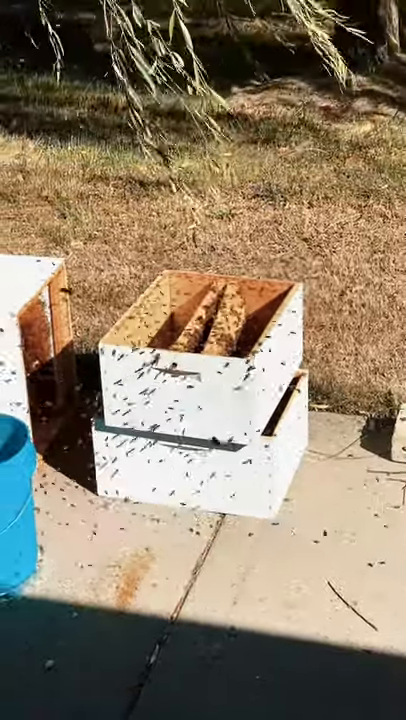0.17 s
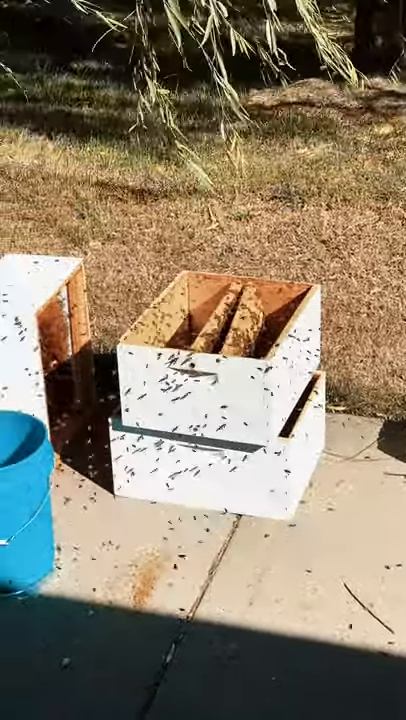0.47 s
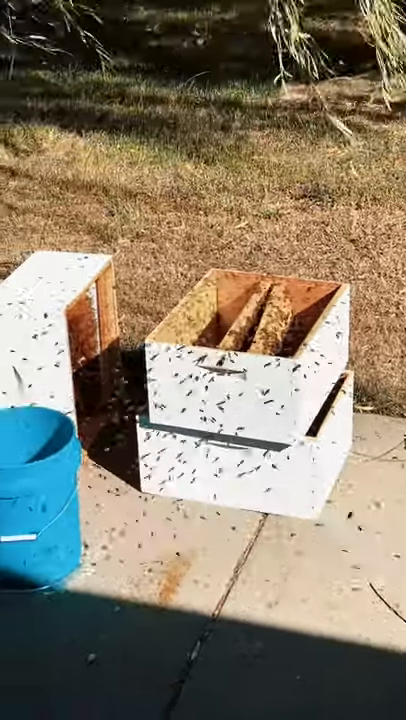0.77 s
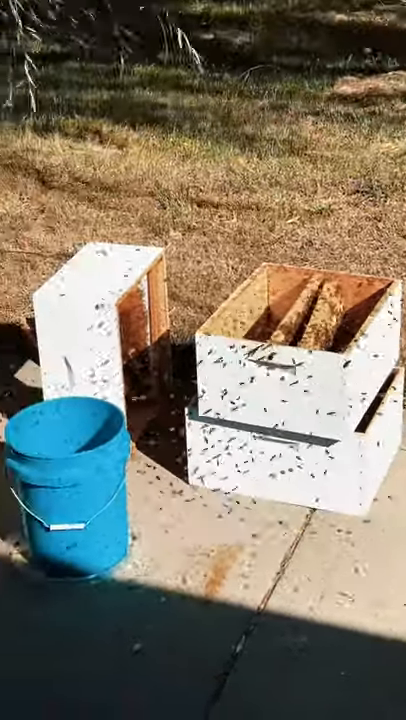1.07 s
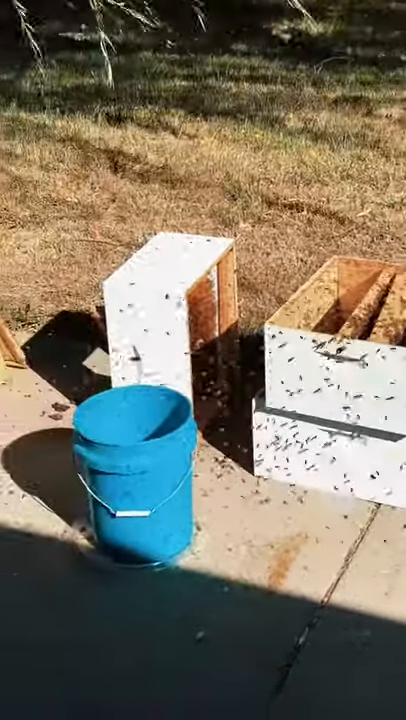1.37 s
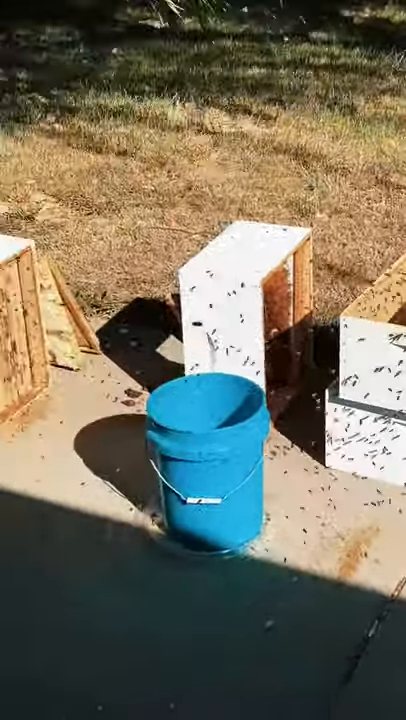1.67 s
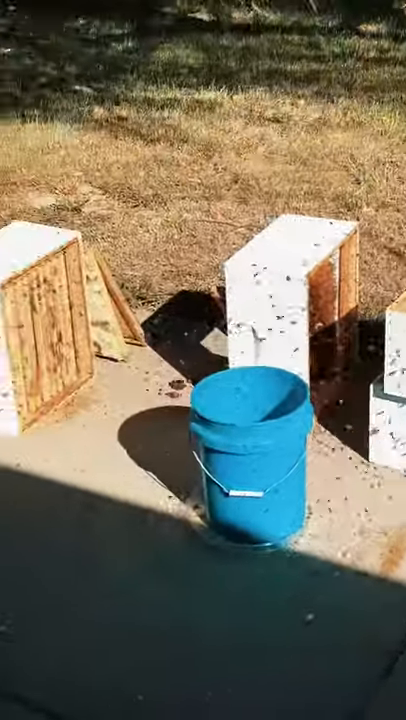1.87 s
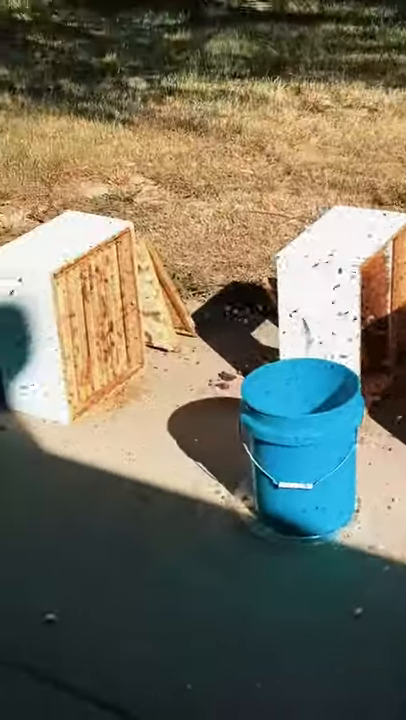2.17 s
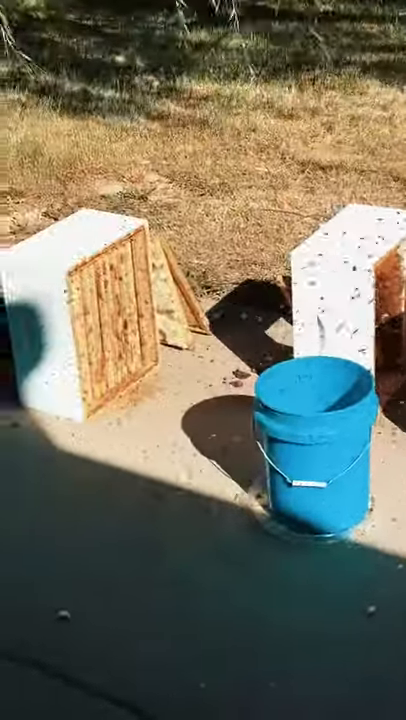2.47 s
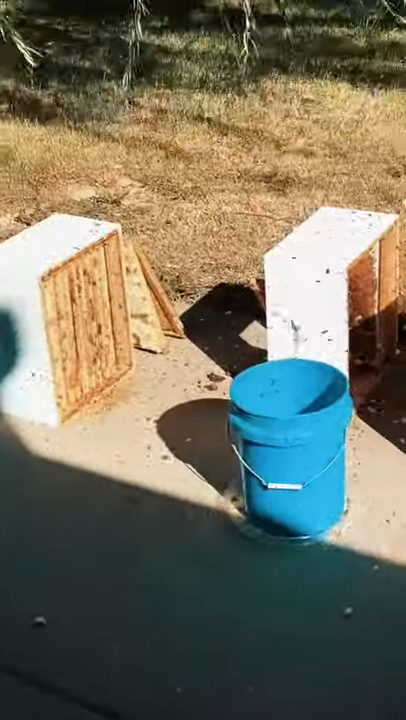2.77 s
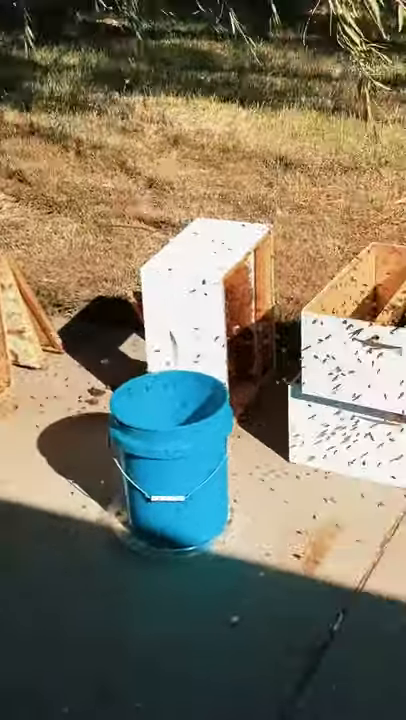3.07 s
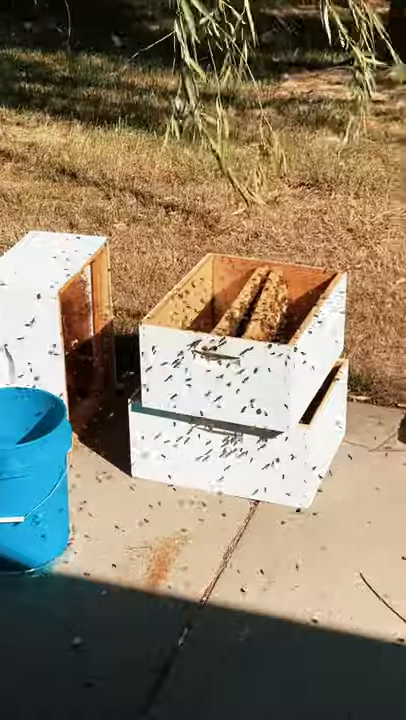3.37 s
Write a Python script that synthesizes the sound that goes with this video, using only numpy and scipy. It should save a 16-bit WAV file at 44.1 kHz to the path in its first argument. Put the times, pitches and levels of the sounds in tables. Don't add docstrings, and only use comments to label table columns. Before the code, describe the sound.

Many bees hum in a dense, continuous drone over airy hiss and low puffs of wind.

```python
import sys
import numpy as np
from scipy import signal
from scipy.fft import rfft, irfft, next_fast_len
from scipy.io import wavfile
from scipy.ndimage import uniform_filter1d, map_coordinates

SR = 44100
rng = np.random.default_rng(int(sys.argv[2]) if len(sys.argv) > 2 else 0)


def elevation(decibels):
    levels = np.asarray(decibels, float)
    return 10 ** (levels / 20)


def store_pcm(level_fs):
    pcm = np.round(np.clip(level_fs, -1, 1) * 32767).astype(np.int16)
    wavfile.write(sys.argv[1], SR, np.atleast_2d(pcm).T)


N = 154791

# (time [s], level change [dB])
SWARM_LEVEL = [(0, 0), (1.2, .4), (2.0, 0), (2.8, -.8), (3.51, -.2)]
# (frequency [Hz], level [dB])
WING_SPECTRUM = [(150, -4), (250, -1), (520, 1.5), (770, -6.5), (1300, -8.5), (1900, -18.5), (3500, -22.5),
                 (4500, -72)]
# (frequency [Hz], level [dB])
LEFT_WING_SPECTRUM = [(300, -36), (520, 0.5), (780, 1), (1300, -2.5), (1550, -6), (1750, -61)]
# (time [s], half length [s], wingbeat [Hz], level [dB])
CLOSE_BEES = [
    (3.311, 0.022, 260.4, -51.5),
    (3.378, 0.018, 261.4, -48.5),
    (3.47, 0.039, 258.7, -50.5),
]
# (time [s], peak level [dB], pitch [Hz])
WIND_PUFFS = [(0.29, -32.5, 111), (0.347, -32, 64.6), (0.529, -32, 64), (0.585, -29, 63), (0.655, -29, 67),
              (0.724, -32.5, 75.4), (0.839, -36.5, 58.7), (1.499, -38, 59.2), (1.574, -20.5, 131),
              (1.618, -29, 56), (1.689, -33, 117), (1.74, -38, 86.1), (1.794, -27, 116), (1.839, -24.5, 99),
              (1.933, -28, 70.5), (1.969, -32.5, 48.4), (2.034, -24.5, 122), (2.059, -28, 82),
              (2.09, -35, 68.5), (2.184, -33, 88), (2.228, -35.5, 79.4), (2.871, -36, 63),
              (2.919, -36.5, 56), (2.969, -36, 72.7), (3.045, -32.5, 99.6), (3.061, -27.5, 67.3),
              (3.223, -26, 195), (3.295, -30, 80.7), (3.46, -27.5, 81), (3.493, -28.5, 84.4)]
# (time [s], level [dB])
WIND_LEVEL = [(0.0, -45), (0.31, -45), (0.5, -45), (0.65, -47.5), (1.16, -50), (1.36, -55.5), (1.49, -42),
              (1.64, -37.5), (1.69, -44.5), (1.91, -42), (2.07, -42.5), (2.24, -60), (2.48, -75),
              (2.75, -54), (3.06, -42), (3.51, -44.5)]
# (frequency [Hz], level [dB])
RUMBLE_SPECTRUM = [(15, -53), (30, -6), (60, 4), (110, -6.5), (180, -11), (300, -19), (500, -50),
                   (900, -90)]
# (frequency [Hz], level [dB])
HISS_SPECTRUM = [(150, 2.5), (400, -6.5), (1500, -6.5), (2200, -10.5), (4500, -14), (10500, -16.5),
                 (12500, -16), (15500, -14.5)]
# (frequency [Hz], level [dB])
OWN_HISS_SPECTRUM = [(1500, -21), (2400, -13), (4200, -7), (4900, -22), (5450, -19), (5800, -13),
                     (11000, -1), (12500, -12.5)]
# (frequency [Hz], level [dB])
YARD_SPECTRUM = [(20, -27), (110, -10.5), (250, -2), (400, -10), (700, -15), (1200, -14), (1500, -22),
                 (1700, -69)]
# (frequency [Hz], phase [rad])
PORT_PHASE = [(600, -.9), (800, 0), (1840, 0), (2600, -1.15), (3720, 0), (4400, -.55), (5250, 0),
              (13000, -3.15)]
# (frequency [Hz], level [dB])
HAND_SHADE = [(650, -2.5), (1400, -2)]

STEP = 4
SWARM_DB, LEFT_DB = -48.5, -3.5
LEFT_LEAK = -0.3
WING_HZ, SPREAD_HZ, SLOW_TAIL_HZ = 272.04, 7, 19
DRIFT_HZ, FLUTTER_HZ = 13, 3
PASS_DB, PASS_RATE = 4.6, 5
PUFF_TURNS, PUFF_SAG = 0.89, 0.6
PUFF_LATE_S, PUFF_TAIL, PUFF_TILT_DB = 0.00742, 1.38, 1.1
HISS_DB, HISS_FADE_DB = -48, -2
OWN_FADE_DB = -5.5
YARD_DB = -63.5
WIND_CUT_HZ, TOP_HZ = 46, 15750
BASS_TURN_HZ = 410
FLIP_HZ, FLIP_WIDE_HZ = 4945, 330
SHADE_START_HZ, SHADE_END_HZ = 430, 1720


def swarm():
    around = bees(WING_SPECTRUM, count=38)
    left = elevation(LEFT_DB) * bees(LEFT_WING_SPECTRUM, count=24)
    crowd = around + np.array([[1], [LEFT_LEAK]]) * left
    return elevation(SWARM_DB + curve(SWARM_LEVEL)) * crowd + near_bee()


def bees(spectrum, count):
    rank = (np.arange(count)[:, None] + .5) / count
    own = rng.standard_normal((count, 1)) * SPREAD_HZ + SLOW_TAIL_HZ * np.log(rank)
    drift = DRIFT_HZ * wobble(3.5, count=count, size=STEP)
    flutter = FLUTTER_HZ * wobble(30, count=count, size=STEP)
    swell = elevation(PASS_DB * wobble(PASS_RATE, count=count, size=STEP))
    crowd = (beats(WING_HZ + own + drift + flutter) * swell).sum(0)
    return spread(crowd / np.sqrt((swell ** 2).sum(0)), spectrum)


def near_bee():
    coarse_t, t = np.arange(0, N, STEP) / SR, np.arange(N) / SR
    out = 0
    for s, half_s, hz, db in CLOSE_BEES:
        sagging_hz = hz - 60 * np.tanh((coarse_t - s) / .5)
        swoop = np.exp(-((t - s) / half_s) ** 2)
        out = out + elevation(db) * swoop * spread(beats(sagging_hz), WING_SPECTRUM)
    return out


def beats(hz):
    start = rng.uniform(size=hz.shape[:-1] + (1,))
    cycles = start + np.cumsum(hz, -1) * STEP / SR
    half_phase = np.pi * (cycles % 1) + 1e-6
    return np.sin(29 * half_phase) / np.sin(half_phase) - 1


def spread(x, spectrum):
    full = np.zeros(N)
    full[::STEP] = x
    return coloured(full, spectrum)


def wind():
    lumps = elevation(2.7 * wobble(22.17)[0])
    rumble = unit(lumps * coloured(rng.standard_normal(N), RUMBLE_SPECTRUM))
    return np.ones((2, 1)) * elevation(curve(WIND_LEVEL)) * rumble + puffs()


def puffs():
    out, t = np.zeros((2, N)), np.arange(N) / SR
    chance = rng.uniform(size=(len(WIND_PUFFS), 2))
    for (s, db, hz), (start, side) in zip(WIND_PUFFS, chance):
        near = slice(max(int((s - .1) * SR), 0), int((s + .15) * SR))
        u = (t[near] - s - PUFF_LATE_S) * hz / PUFF_TURNS
        turns = PUFF_TURNS * (u - PUFF_SAG * np.log(np.cosh(u)))
        envelope = np.exp(-np.where(u > 0, u / PUFF_TAIL, u) ** 2)
        tilt = PUFF_TILT_DB * (2 * side - 1) * np.array([[1], [-1]])
        out[:, near] += elevation(db + tilt) * envelope * np.cos(2 * np.pi * (turns + start))
    return out


def hiss():
    z = signal.stft(rng.standard_normal((3, N)), nperseg=512)[2]
    field = uniform_filter1d(rng.standard_normal(z.shape[1:]), 30, 0)
    patches = elevation(0.57 * unit(uniform_filter1d(field, 12, 1)))
    air = signal.istft(z * patches, nperseg=512)[1][:, :N]
    own = filtered(air[1:], lambda hz: elevation(along(OWN_HISS_SPECTRUM, hz)))
    own_fade = elevation(OWN_FADE_DB * np.clip(np.arange(N) / SR - 2.4, 0, 1))
    level = elevation(HISS_DB + HISS_FADE_DB * np.arange(N) / N + 0.13 * wobble(12)[0])
    return level * coloured(air[0] + own_fade * own, HISS_SPECTRUM)


def yard():
    return elevation(YARD_DB) * coloured(rng.standard_normal((2, N)), YARD_SPECTRUM)


def unit(x):
    return x / np.sqrt(np.mean(x ** 2) + 1e-20)


def along(points, hz):
    f, v = np.transpose(points)
    return np.interp(np.log(hz + 1), np.log(f + 1), v)


def curve(rows):
    return np.interp(np.arange(N) / SR, *np.transpose(rows))


def wobble(rate, count=1, size=1):
    knots = rng.standard_normal((count, 200))
    s = np.arange(0, N + 128, 128)
    rows = [map_coordinates(k, [s * rate / SR]) for k in knots]
    return np.array([np.interp(np.arange(0, N, size), s, r) for r in rows])


def filtered(x, response):
    m = next_fast_len(N + 8192)
    return irfft(rfft(x, m) * response(np.fft.rfftfreq(m, 1 / SR)), m)[..., :N]


def coloured(x, spectrum):
    return unit(filtered(x, lambda hz: elevation(along(spectrum, hz))))


def scene():
    return swarm() + wind() + hiss() + yard()


def port_response(hz):
    in_step = 1 + (BASS_TURN_HZ / (hz + 1)) ** 6
    flip = np.pi * (1 + np.tanh((hz - FLIP_HZ) / FLIP_WIDE_HZ))
    turn = np.maximum(along(PORT_PHASE, hz), -np.pi) / in_step - flip
    shade_points = [(SHADE_START_HZ, 0), *HAND_SHADE, (SHADE_END_HZ, 0)]
    shade = elevation(np.array([[-.5], [.5]]) * along(shade_points, hz))
    u = 1j * hz / WIND_CUT_HZ
    low_cut = u * u / (u * u + 1.25 * u + 1)
    return np.exp(.5j * np.array([-turn, turn])) * shade * low_cut * (hz < TOP_HZ)


def low_pass(x):
    return signal.sosfilt(signal.butter(12, 16340, fs=SR, output="sos"), x)


def record(dry):
    mix = filtered(dry, port_response)
    return low_pass(mix)


dry = scene()
out = record(dry)
store_pcm(out)
```